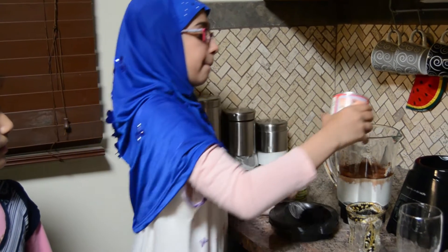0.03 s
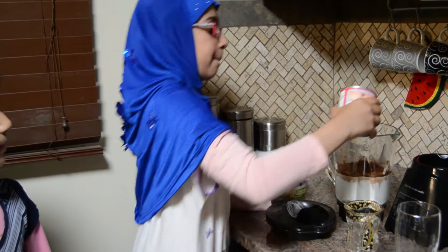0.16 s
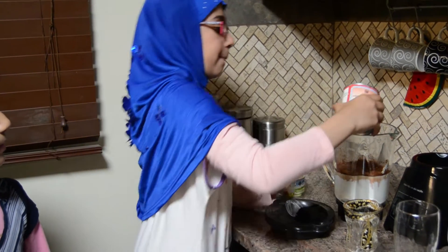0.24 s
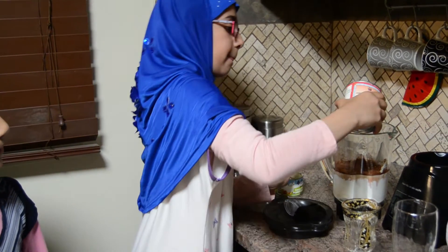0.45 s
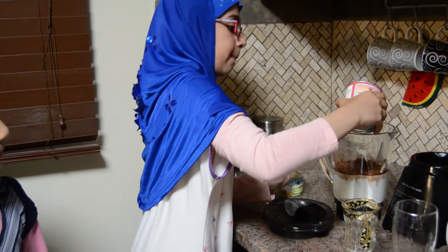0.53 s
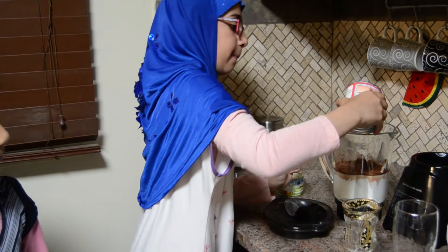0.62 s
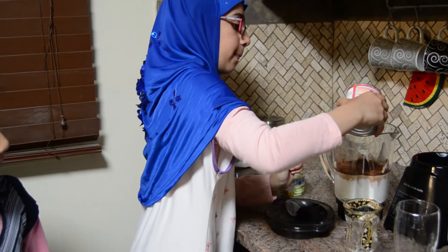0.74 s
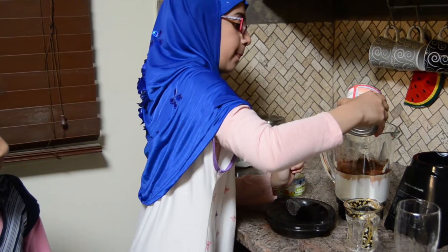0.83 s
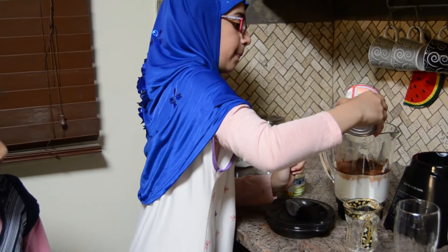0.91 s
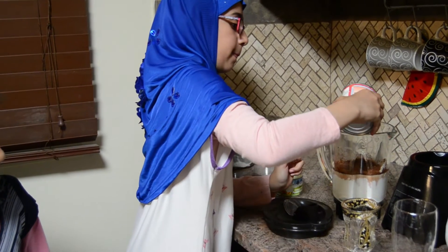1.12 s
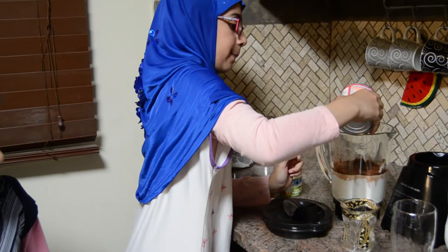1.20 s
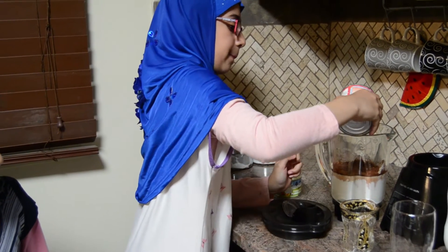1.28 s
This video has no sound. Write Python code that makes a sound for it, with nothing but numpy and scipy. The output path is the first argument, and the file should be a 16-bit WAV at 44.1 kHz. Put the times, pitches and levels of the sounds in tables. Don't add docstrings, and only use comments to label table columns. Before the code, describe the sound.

A hollow metal can knocks a glass blender jar. Light, dull touches come at about 0.11-0.16 s, then a hard, bright clank at 0.20-0.21 s, chattering quickly and fading to 0.28 s. A rebound at 0.30 s gives a short clear glass ring with a soft worktop bump. A faint click follows at 0.44-0.46 s. Short tiled-kitchen reflections, faint fridge hum and quiet room air remain.

```python
import sys
import numpy as np
from scipy import signal
from scipy.io import wavfile
from scipy.ndimage import uniform_filter1d

SR = 44100
rng = np.random.default_rng(int(sys.argv[2]) if len(sys.argv) > 2 else 0)


def dump(signal):
    limited = np.clip(np.atleast_2d(signal).T, -1, 1)
    pcm = np.round(limited * 32767).astype(np.int16)
    wavfile.write(sys.argv[1], SR, pcm)


def rack_gain(trim_db):
    fader = np.asarray(trim_db, float)
    return 10 ** (fader / 20)


N = 59535

# pitch_hz, level_db
AIR_SPECTRUM = [(25, -20.5), (76, -22), (135, -2.5), (260, -6.5), (940, -10), (2360, -20), (4500, -37.5),
                (12000, -51.5)]
AIR_DB, AIR_TOP_HZ = -57, 11950
# pitch_hz, level_db, waver_fraction
HUM_PARTIALS = [(21.3, -77.5, .1), (59, -70, 0), (120.8, -64.5, 0.12), (181, -67.5, 0.17),
                (250.4, -70, 0.59)]
# start_s, level_db
BUMPS = [
    (0.114, -45),
    (0.312, -35),
    (0.343, -52),
    (0.444, -40.5),
    (.49, -42),
]
BUMP_HZ, BUMP_T60_S, BUMP_RISE_S = 178, 0.089, 0.01
# pitch_hz, t60_s
KITCHEN_DECAY = [(250, 0.88), (500, 0.23), (1000, 0.48), (2000, 0.35), (4000, 0.37), (10000, 0.18)]
WET_DB = [-8, -7, -11.5, 3]
FIRST_ECHO_S = 0.004

# start_s, body_db, contact_db, brightness_db_per_octave, pitch_hz (body pitch set by the grip)
BLOWS = [(0.1112, -41, -49.5, 12, 500), (.1155, -30.5, -46, -0.5, 490), (.1235, -29.5, -53.5, -7, 600),
         (.142, -32, -84, 3.5, 500), (.158, -40.5, -70.5, -4.5, 478), (.2025, -18.5, -37.5, 2.5, 538),
         (0.2056, -25.5, -23, 0.5, 604), (0.2106, -10.5, -22.5, -5.5, 654), (.2205, -14.5, -41.5, 9, 656),
         (.229, -23, -36, -3.5, 600), (.239, -20.5, -35, -4, 539), (0.263, -23, -39, 3, 461),
         (.278, -35, -47, -6, 470), (.3005, -32, -40, 5, 530), (.312, -33.5, -52, -8, 516),
         (.4415, -33.5, -60, -16, 715), (0.447, -30, -46, 12, 778), (.456, -43.5, -49, 6, 683)]
# pitch_hz, level_db, t60_s
BODY_MODES = [(310, -18.5, 0.031), (409, -4, 0.046), (468.2, 2, 0.048), (500, 2.5, 0.058),
              (527.1, 1, 0.083), (600, -1.5, 0.042), (641.2, 4, 0.036), (662.4, -1.5, 0.048),
              (814, -4, 0.045)]
# pitch_hz, level_db, t60_s
WALL_MODES = [(1169, -5, 0.033), (1343, -3, 0.009), (1673, -19, 0.074), (1900, -14.5, 0.026),
              (1962, -2.5, 0.032), (2216, 1, 0.022), (2073, -2.5, 0.01), (2384, -10.5, 0.013),
              (2626, -25.5, 0.0074), (3290, -25, 0.061), (3466, -37, 0.22), (5180, -30.5, 0.019),
              (10650, -48, .04), (14250, -63, .05)]
# pitch_hz, level_db, t60_s
GLASS_MODES = [(1067, 0, 0.28), (1184, 4.5, 0.19), (1922, -6.5, .07), (3480, -24, 0.23), (5700, -47, 0.15),
               (11750, -50, .08)]
# start_s, level_db, upper_db (upper rim mode over the lower)
GLASS_RINGS = [
    (0.2055, -44, 9),
    (0.2989, -29.5, -3.5),
    (0.4458, -54.5, 8),
    (0.478, -58, 14),
]
# pitch_hz, level_db
TICK_SPECTRUM = [(150, -46), (600, -11.5), (1300, -10), (2500, -18.5), (3200, -24), (6000, -46),
                 (11000, -52.5), (14500, -73.5)]
TICK_T60_S, TICK_RISE_S = 0.042, 0.0014
RISE_S = [0.0026, 0.0004, 0.0041]
WALL_DB = 6.5
SCATTER_DB = 2.5
FOCUS_DB = 75.5
DETUNE = 0.019
BRIGHT_HZ, BRIGHT_SPAN = 2500, 1.88
THIN_HZ = 252


def evened(x):
    return x / np.sqrt(np.mean(x ** 2) + 1e-20)


def read(points, hz):
    f, value = np.transpose(points)
    return np.interp(np.log(hz + 1), np.log(f + 1), value)


def add(mix, s, sound):
    part = mix[round(s * SR):][:len(sound)]
    part += sound[:len(part)]


def drift(rate_hz, t):
    rates = rate_hz * np.geomspace(1 / 20, 1, num=20)
    return evened(sum(np.sin(2 * np.pi * (f * t + rng.random())) / np.sqrt(f) for f in rates))


def air():
    frames, hz = N // 512 + 5, np.fft.rfftfreq(2048, 1 / SR)
    real, imag, patches = rng.standard_normal((frames, 1025, 3)).T
    patches = uniform_filter1d(patches, size=16, axis=0)
    patches = evened(uniform_filter1d(patches, size=6, axis=1))
    level = rack_gain(read(AIR_SPECTRUM, hz)[:, None] + 0.81 * patches)
    spectrum = (real + 1j * imag) * level * (hz < AIR_TOP_HZ)[:, None]
    noise = signal.istft(spectrum, nperseg=2048, noverlap=1536)[1][:N]
    return rack_gain(AIR_DB) * evened(noise)


def fridge():
    t = np.arange(N) / SR
    hum = np.zeros(N)
    for hz, db, waver in HUM_PARTIALS:
        level = np.sqrt(2) * rack_gain(db) * (1 + waver * drift(25, t))
        hum += level * np.sin(2 * np.pi * (hz * t + rng.random()))
    return hum


def counter():
    t, out = np.arange(SR // 4) / SR, np.zeros(N)
    for s, db in BUMPS:
        envelope = rack_gain(db - 60 * t / BUMP_T60_S) * (1 - np.exp(-t / BUMP_RISE_S))
        add(out, s, envelope * np.sin(2 * np.pi * BUMP_HZ * t))
    return out


def kitchen(x):
    taps = np.zeros(SR)
    at = np.arange(0, SR - 20, 20) + rng.integers(0, 20, SR // 20 - 1)
    taps[at] = rng.choice([-1., 1.], at.shape)
    hz, t, z = signal.stft(taps, SR, nperseg=256)
    decay = rack_gain(-60 * t / read(KITCHEN_DECAY, hz)[:, None])
    tail = signal.istft(z * decay, SR, nperseg=256)[1]
    out = np.zeros(N)
    add(out, FIRST_ECHO_S, signal.fftconvolve(x, tail / np.linalg.norm(tail)))
    return out


def treble_tilt(hz, bright_db):
    return bright_db * np.log2(np.clip(hz / BRIGHT_HZ, 1, BRIGHT_SPAN))


def colour(x, points, bright_db):
    hz = abs(np.fft.fftfreq(4096, 1 / SR))
    log_gain = np.log(rack_gain(read(points, hz) + treble_tilt(hz, bright_db)))
    phase = -signal.hilbert(log_gain).imag
    taps = np.fft.ifft(np.exp(log_gain + 1j * phase)).real[:2048]
    return signal.fftconvolve(x, taps / np.linalg.norm(taps))[:len(x)]


def ring(modes, rise_s, share_db):
    t = np.arange(SR // 2) / SR
    out = np.zeros(len(t))
    for (hz, db, t60), share in zip(modes, share_db):
        out += rack_gain(db + share - 60 * t / t60) * np.sin(2 * np.pi * hz * t)
    return out * (1 - np.exp(-(t / rise_s) ** 2))


def contact_tick(noise, bright_db):
    t = np.arange(len(noise)) / SR
    burst = noise * rack_gain(-60 * t / TICK_T60_S) * (1 - np.exp(-t / TICK_RISE_S))
    return colour(burst, TICK_SPECTRUM, bright_db)


def dented_wall(chance):
    return [(hz * (1 + DETUNE * d * min(0.026 / t60, 1) ** 2), db, t60)
            for (hz, db, t60), d in zip(WALL_MODES, chance)]


def knocks():
    body, wall, glass, tick = layers = np.zeros((4, N))
    body_hz, wall_hz = np.array(BODY_MODES)[:, 0], np.array(WALL_MODES)[:, 0]
    for s, body_db, contact_db, bright_db, pitch_hz in BLOWS:
        noise = rng.standard_normal(2048)
        spot_db = SCATTER_DB * rng.standard_normal(len(WALL_MODES))
        focus_db = -FOCUS_DB * np.log2(body_hz / pitch_hz) ** 2
        add(body, s, rack_gain(body_db) * ring(BODY_MODES, RISE_S[0], focus_db + spot_db[:len(BODY_MODES)]))
        wall_share_db = treble_tilt(wall_hz, bright_db) + spot_db
        add(wall, s, rack_gain(contact_db + WALL_DB) * ring(dented_wall(noise), RISE_S[1], wall_share_db))
        add(tick, s, rack_gain(contact_db) * contact_tick(noise, bright_db))
    for s, db, upper_db in GLASS_RINGS:
        share_db = upper_db * (np.arange(len(GLASS_MODES)) == 1)
        add(glass, s, rack_gain(db) * ring(GLASS_MODES, RISE_S[2], share_db))
    return layers


def scene():
    high_pass = signal.butter(2, THIN_HZ, "high", fs=SR, output="sos")
    layers = signal.sosfilt(high_pass, knocks())
    wet = kitchen((layers * rack_gain(np.array(WET_DB))[:, None]).sum(0))
    return (layers.sum(0) + wet + counter() + air() + fridge())[None]


def top_cut(x):
    return signal.sosfilt(signal.butter(12, 14700, fs=SR, output="sos"), x)


def record(dry):
    return top_cut(dry)


dry = scene()
out = record(dry)
dump(out)
```